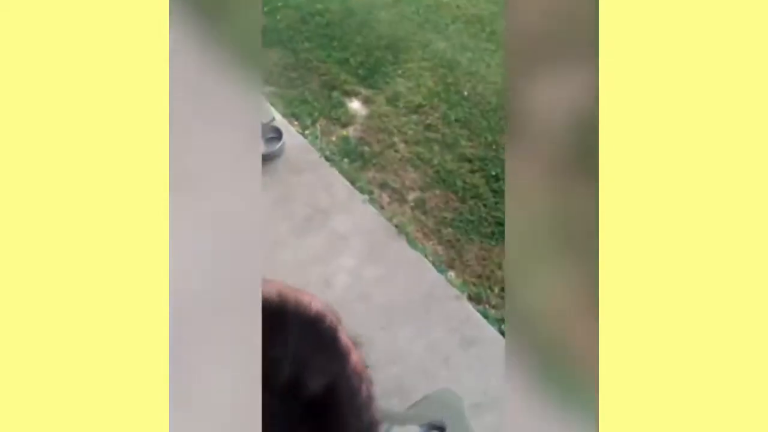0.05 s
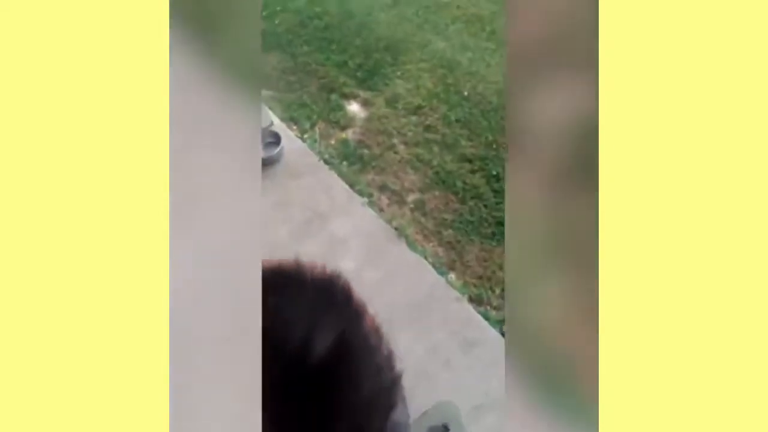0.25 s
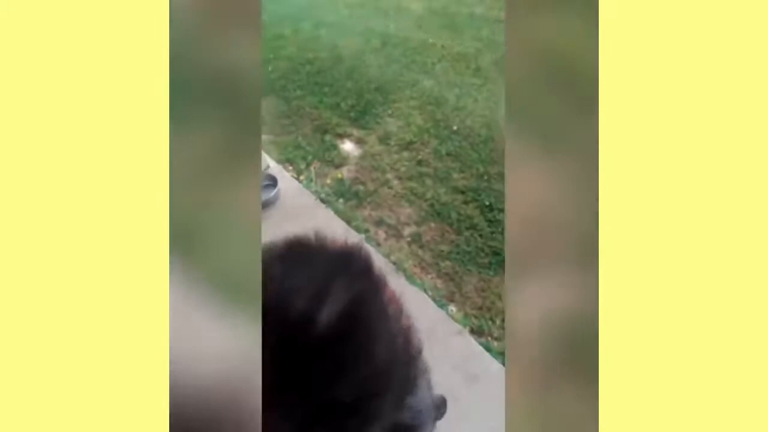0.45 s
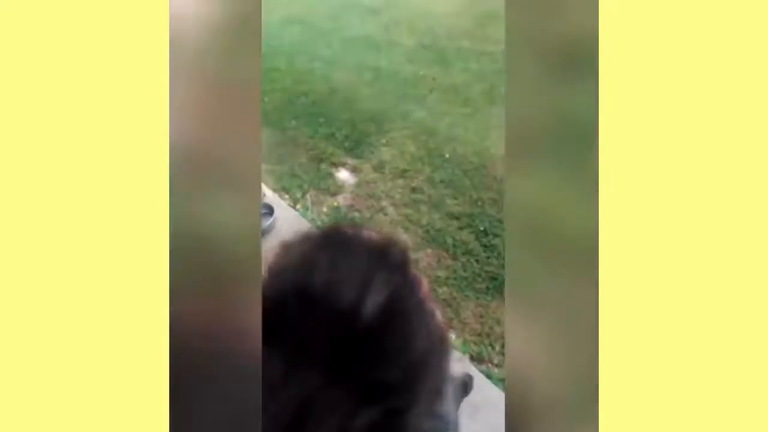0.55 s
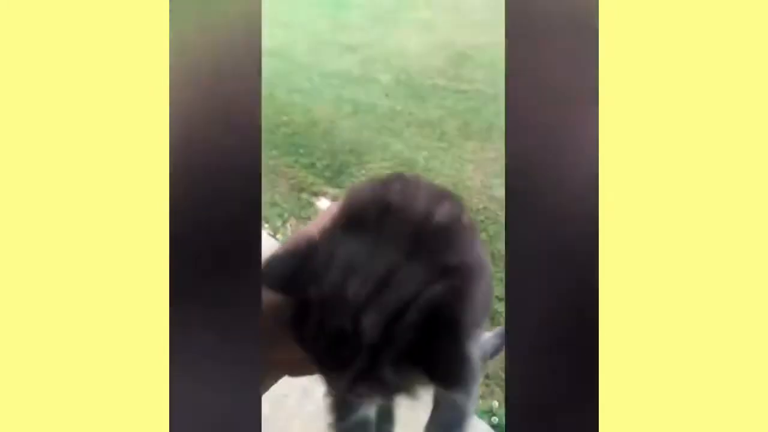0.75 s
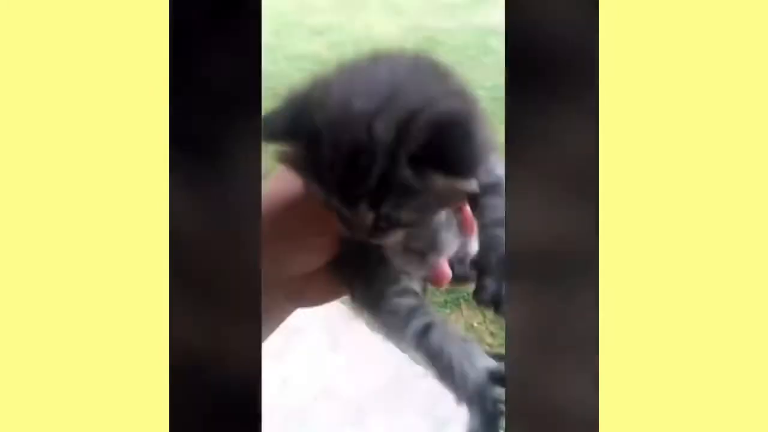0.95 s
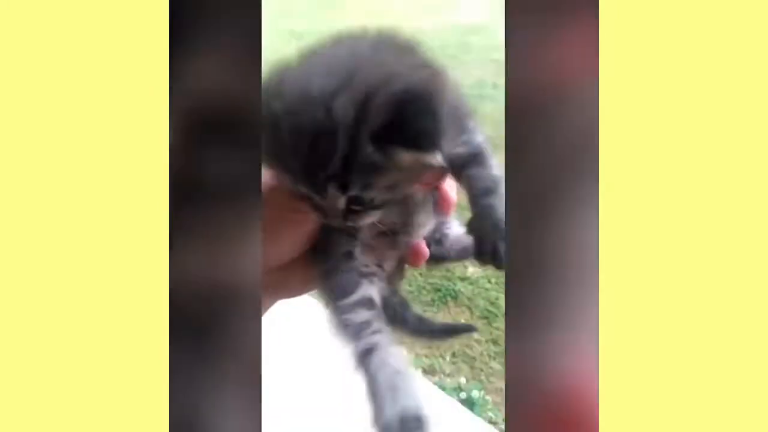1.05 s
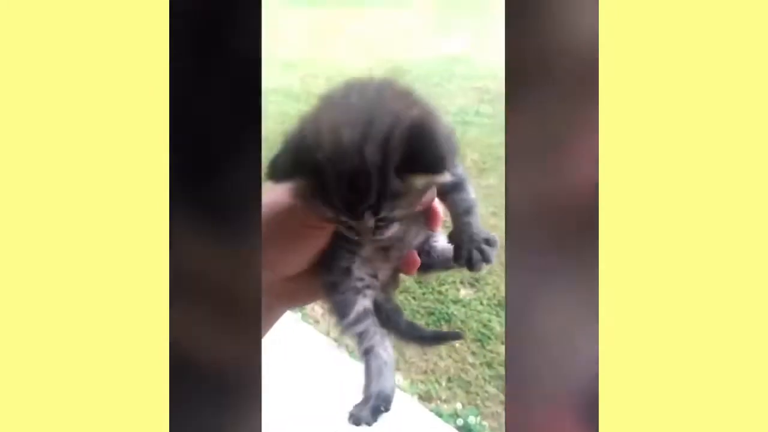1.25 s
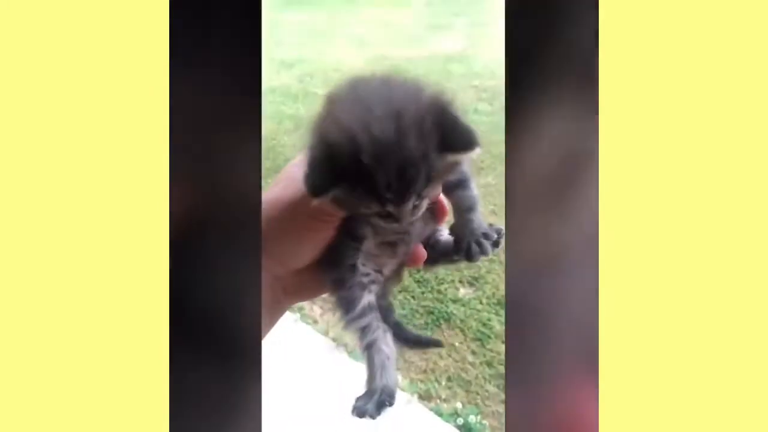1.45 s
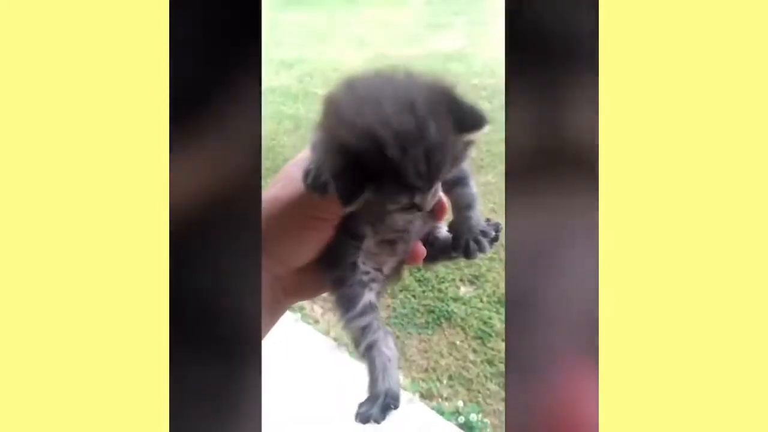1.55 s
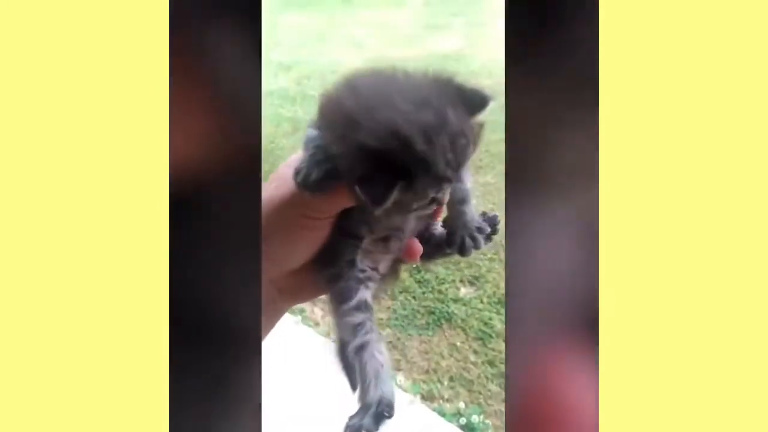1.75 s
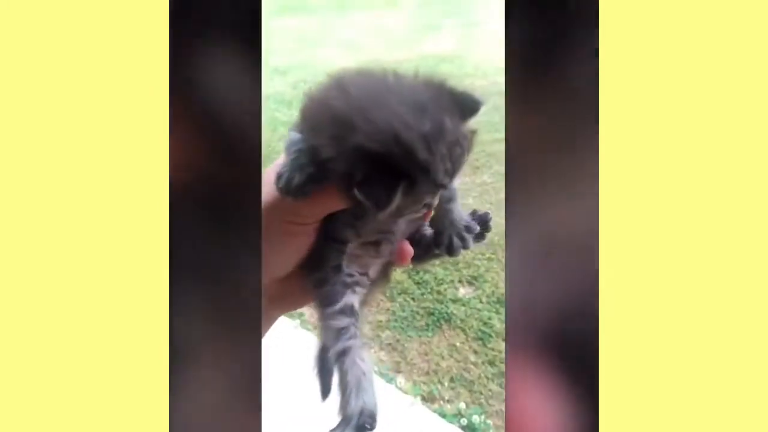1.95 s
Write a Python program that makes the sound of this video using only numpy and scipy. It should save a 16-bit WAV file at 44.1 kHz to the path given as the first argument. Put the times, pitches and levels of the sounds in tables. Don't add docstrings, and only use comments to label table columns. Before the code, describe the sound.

A tiny kitten close to a handheld phone gives four very short, high arched mews; a second kitten mews once, longer and fainter, and a finger thumps the phone midway, over soft outdoor air.

```python
import sys
import numpy as np
from scipy import signal
from scipy.fft import rfft, irfft, next_fast_len
from scipy.io import wavfile
from scipy.ndimage import uniform_filter1d, map_coordinates

SR = 44100
rng = np.random.default_rng(int(sys.argv[2]) if len(sys.argv) > 2 else 0)


def digitize_waveform(pressure):
    field = np.atleast_2d(pressure).T
    bounded = np.clip(field, -1, 1)
    quanta = np.round(bounded * 32767).astype(np.int16)
    wavfile.write(sys.argv[1], SR, quanta)


def gain_from_db(level_db):
    decades = np.asarray(level_db, float) / 20
    return 10 ** decades


N = 88200

# (lag of left port [ms], left over right [dB], breath under voice [dB], echo [dB], flutter [dB])
CALL_SETTINGS = [
    (0.054, -7.5, -17.5, -21.5, 1.5),
    (-0.1334, 12, -11.5, -19.5, 2.83),
    (0.099, 11, -15.5, -17.5, 2),
    (-0.55, -10, -21, -11, 2),
    (0.097, 10.5, -15, -14, 2.5),
    (0.22, -17.5, -16, 0.5, 4.5),
]


def unit(x):
    return x / np.sqrt(np.mean(x ** 2) + 1e-20)


def along(points, hz):
    f, v = np.transpose(points)
    return np.interp(np.log(hz + 1), np.log(f + 1), v)


def wobble(rate_hz):
    knots = rng.standard_normal(int(N * rate_hz / SR) + 4)
    return map_coordinates(knots, [np.arange(N) * rate_hz / SR])


def filtered(x, response):
    m = next_fast_len(N + 8192)
    return irfft(rfft(x, m) * response(np.fft.rfftfreq(m, 1 / SR)), m)[..., :N]


def ports(x, lag_ms, pan_db):
    side = np.array([[1], [-1]]) / 2
    return filtered(x, lambda hz: gain_from_db(pan_db * side) * np.exp(-2j * np.pi * hz * side * lag_ms / 1000))


def rush(spectrum, patchy_db):
    # (frequency [Hz], correlation [0-1])
    likeness = [(60, 0.95), (300, 0.77), (1000, 0.27), (2500, 0.1), (8000, .1)]
    z = signal.stft(rng.standard_normal((2, N)), nperseg=512)[2]
    field = rng.standard_normal(z.shape[1:])
    field = uniform_filter1d(uniform_filter1d(field, 6, 0), 10, 1)
    pair = signal.istft(z * gain_from_db(patchy_db * unit(field)), nperseg=512)[1][:, :N]

    def mid_side(hz):
        turn = np.arccos(np.clip(along(likeness, hz), -1, 1)) / 2
        return gain_from_db(along(spectrum, hz)) * [np.cos(turn), np.sin(turn)]

    mid, side = filtered(pair, mid_side)
    return unit(np.array([mid + side, mid - side]))


def traffic():
    # (frequency [Hz], density [dB/Hz])
    road_spectrum = [(30, -12), (70, -5.5), (120, 6), (250, -7.5), (500, -12.5), (1000, -24), (1600, -34.5),
                     (3000, -37)]
    level_db, lag_ms = -47, 0.16
    road = gain_from_db(level_db + 0.5 * wobble(4)) * rush(road_spectrum, patchy_db=0.8)
    return filtered(road, lambda hz: np.exp(-1j * np.pi * hz * [[1], [-1]] * lag_ms / 1000))


def leaves():
    # (time [s], level [dB])
    gusts = [(0, -53.5), (.1, -56), (.3, -50.5), (.6, -72), (.9, -68.5), (1.15, -57.5), (1.5, -64),
             (1.8, -58), (2, -71.5)]
    # (frequency [Hz], density [dB/Hz])
    leaf_spectrum = [(600, -4.5), (1500, 1.5), (3000, -3.5), (6000, -9), (8500, -0.5), (11500, 0),
                     (14000, -14), (15800, -20)]
    gust_db = np.interp(np.arange(N) / SR, *np.transpose(gusts))
    return gain_from_db(gust_db + 0.8 * wobble(2.7)) * rush(leaf_spectrum, patchy_db=3.5)


def drones():
    # (frequency [Hz], half width [Hz], level [dB])
    drone_lines = [
        (123.7, 3.6, -52),
        (226, 5.9, -59),
        (7960, 10, -88),
    ]
    total = 0
    for hz, width_hz, db in drone_lines:
        line = filtered(rng.standard_normal(N), lambda f: 1 / (1 + ((f - hz) / width_hz) ** 2))
        total = total + gain_from_db(db) * unit(line)
    return total * [[1], [0.9]]


def bird():
    # (start [s], length [s], from [Hz], to [Hz], level [dB])
    tweet = (0, .022, 10000, 9100, -52)
    start_s, length_s, hz, end_hz, db = tweet
    u = np.clip((np.arange(N) / SR - start_s) / length_s, 0, 1)
    return gain_from_db(db) * (1 - u) * np.sin(2 * np.pi * np.cumsum(hz + (end_hz - hz) * u) / SR)


def wall(x):
    # (frequency [Hz], T60 [s])
    wall_t60 = [(500, .25), (1500, 0.25), (4000, 0.17), (12000, 0.075)]
    delay_s = 0.012
    hz, t, z = signal.stft(rng.standard_normal((2, SR // 3)), SR, nperseg=256)
    tail = signal.istft(z * gain_from_db(-60 * t / along(wall_t60, hz)[:, None]), SR, nperseg=256)[1]
    tail = tail / np.linalg.norm(tail[0])
    late = np.pad(x, (round(delay_s * SR), 0))
    return signal.fftconvolve(late[None], tail, axes=1)[:, :N]


def mew(rows, lag_ms, pan_db, breath_db, echo_db, flutter_db, throat):
    # (frequency [Hz], density [dB/Hz])
    breath_spectrum = [(700, -34), (2000, -4), (4000, 1.5), (6500, 2.5), (9000, -6), (12000, -3.5),
                       (14500, 0), (16000, -14)]
    jitter, breath_lead_s, edge_s = 0.0047, 0.012, 0.0022
    t = np.arange(N) / SR
    s, *cols = np.transpose(rows)
    pitch_hz, level_db, tilt_db = [uniform_filter1d(np.interp(t, s, c), size=150) for c in cols]

    def gate(lead_s):
        return np.clip(np.minimum(t - s[0] + lead_s, s[-1] - t) / edge_s, 0, 1)

    rough = 0.008 * np.maximum(flutter_db - 2, 0)
    scatter = jitter * wobble(300) + rough * wobble(700)
    phase = 2 * np.pi * np.cumsum(pitch_hz * (1 + scatter)) / SR

    k = np.arange(1, 11)[:, None]
    size = gain_from_db(tilt_db * np.log2(k) + along(throat, k * pitch_hz))
    size = size / np.sqrt(np.sum(size ** 2, 0) / 2)
    size = size * gain_from_db(flutter_db * np.array([wobble(150) for _ in k]))
    tone = np.sum(size * np.sin(k * phase), 0) * gate(0) * gain_from_db(level_db)

    puffs = rng.standard_normal(N) * (1 + 0.23 * np.sin(phase))
    hiss = unit(filtered(puffs, lambda hz: gain_from_db(along(breath_spectrum, hz))))
    soft_db = 0.69 * level_db + 0.5 * level_db.max()
    voice = tone + hiss * gate(breath_lead_s) * gain_from_db(soft_db + breath_db)
    return ports(voice, lag_ms, pan_db) + gain_from_db(echo_db) * wall(voice)


def far_kitten():
    # (time [s], pitch [Hz], level [dB], mouth opening [dB/octave])
    far_mew = [(0.116, 860, -55, -4.5), (.135, 935.4, -49, 1), (0.184, 1289, -51.5, 2.5),
               (0.271, 1417, -44.5, 11.5), (0.348, 1378, -52, 1), (0.432, 1341, -58, 1.5),
               (0.498, 1203, -52.5, -6.5), (0.556, 931, -61, -7), (0.592, 833, -71.5, -1)]
    # (frequency [Hz], gain [dB])
    far_throat = [(800, 0), (1400, 0), (2000, -2), (2800, -6), (4000, 0), (5500, -10), (8000, -16),
                  (10000, -45)]
    return mew(far_mew, *CALL_SETTINGS[-1], far_throat)


def near_kitten():
    # (time [s], pitch [Hz], level [dB], mouth opening [dB/octave])
    mew_1 = [(0.23, 750.4, -32.5, -53), (0.238, 882, -23, -19), (0.248, 1069, -15, -14),
             (0.256, 1216, -17.5, -7.5), (0.27, 1429, -20.5, -8.5), (0.286, 1492, -18, -7),
             (0.298, 1448, -21.5, -7.5), (0.312, 987, -46, -11)]
    mew_2 = [(0.637, 992, -39, -23), (0.649, 1151, -25, -12.5), (0.669, 1470, -21.5, -7.5),
             (0.683, 1597, -29, -6.5), (0.697, 1665, -21.5, 9.5), (0.709, 1628, -24.5, 0),
             (0.715, 1627, -28, 4), (0.73, 1237, -40.5, -25)]
    mew_3 = [(1.094, 1041, -39.5, -24.5), (1.1, 1110, -33, -11.5), (1.11, 1232, -34.5, -16.5),
             (1.12, 1386, -28, -7.5), (1.135, 1458, -21, -6), (1.149, 1526, -23, -2),
             (1.167, 1504, -25.5, 1.5), (1.175, 1344, -38.5, -8.5), (1.184, 1194, -53, -8.5)]
    warm_up = [(1.573, 370, -50, -20), (1.579, 385, -41, -20), (1.59, 450, -43, -20),
               (1.603, 640, -44, -19), (1.614, 860, -42, -19), (1.62, 930, -52, -19)]
    mew_4 = [(1.632, 1252, -46.5, -17), (1.65, 1345, -37, -5.5), (1.68, 1435, -25, -7),
             (1.7, 1391, -25, -2), (1.712, 1306, -38, 14), (1.718, 1280, -33.5, 0.5),
             (1.73, 1011, -50.5, -62)]
    # (frequency [Hz], gain [dB])
    near_throat = [(400, 2.5), (1200, -2.5), (2000, -2.5), (3000, 8), (4300, -4), (5800, -12.5),
                   (7000, -31.5), (10000, -54)]
    calls = [mew_1, mew_2, mew_3, warm_up, mew_4]
    return sum(mew(rows, *settings, near_throat) for rows, settings in zip(calls, CALL_SETTINGS))


def bump():
    start_s, start_hz, end_hz, sag_s = 0.8227, 305, 105, 0.0038
    flex_db, t60_s, rise_s = -5.5, 0.045, 0.002
    scrape_db, scrape_s, scrape_lead_s = -40, 0.001, 0.0008
    left_share = 0.3
    t = np.arange(N) / SR
    u = np.maximum(t - start_s, 0)
    turns = end_hz * u + (start_hz - end_hz) * sag_s * (1 - np.exp(-u / sag_s))
    envelope = gain_from_db(flex_db - 60 * u / t60_s) * (1 - np.exp(-(u / rise_s) ** 2))
    flex = envelope * np.sin(2 * np.pi * turns)
    v = np.maximum(t - start_s + scrape_lead_s, 0) / scrape_s
    grit = filtered(rng.standard_normal((2, N)), lambda hz: 1 + 12 / (1 + (hz / 800) ** 4))
    scrape = gain_from_db(scrape_db) * v * np.exp(1 - v) * grit
    return flex * [[-left_share], [1 - left_share + 0.12]] + scrape


def smacks():
    # (time [s], peak level [dB], frequency [Hz])
    lip_clicks = [
        (1.088, -44, 2300),
        (1.576, -46, 800),
        (1.624, -46, 2200),
        (1.707, -44, 3800),
    ]
    t60_s = 0.008
    t, out = np.arange(N) / SR, 0
    for s, db, hz in lip_clicks:
        u = np.maximum(t - s, 0)
        ring = np.sin(2 * np.pi * hz * u) + 0.05 * rng.standard_normal(N) * (u > 0)
        out = out + gain_from_db(db - 60 * u / t60_s) * ring
    return ports(out, lag_ms=0.083, pan_db=28.5)


def scene():
    lawn = traffic() + leaves() + drones() + bird()
    return lawn + far_kitten() + near_kitten() + bump() + smacks()


def roll_off(x):
    return signal.sosfilt(signal.butter(12, 16400, fs=SR, output="sos"), x)


def record(dry):
    cross, cross_ms, cross_top_hz, top_hz = 0.88, 0.405, 9000, 15800

    def leak(hz):
        return cross / (1 + (hz / cross_top_hz) ** 4) * np.exp(-2j * np.pi * hz * cross_ms / 1000)

    wide = dry - filtered(dry[::-1], leak)
    mix = filtered(wide, lambda hz: hz < top_hz) * gain_from_db([[-4], [-2.5]])
    return roll_off(mix)


dry = scene()
out = record(dry)
digitize_waveform(out)
```